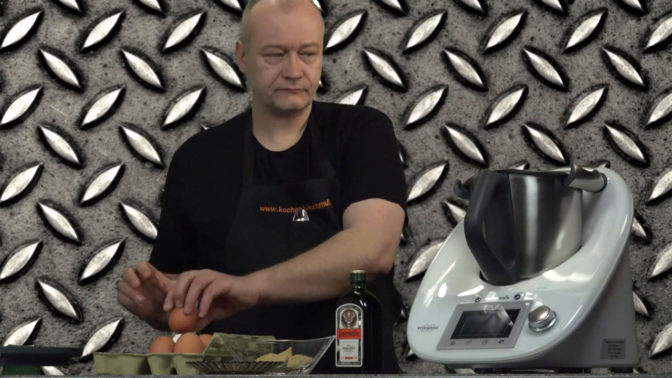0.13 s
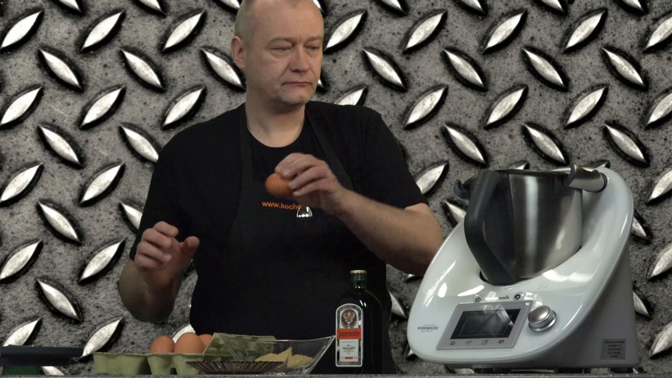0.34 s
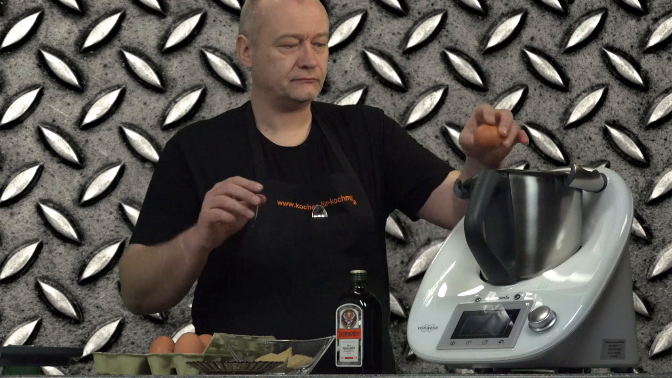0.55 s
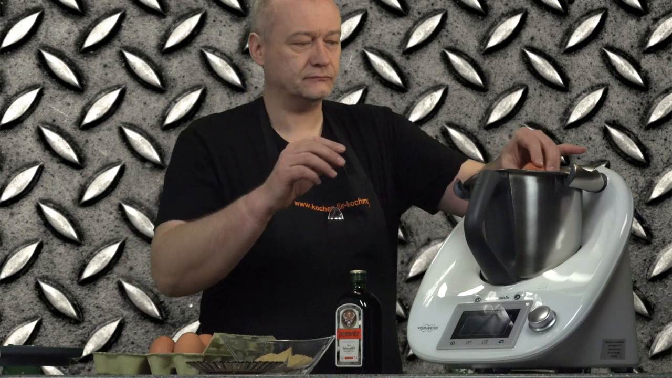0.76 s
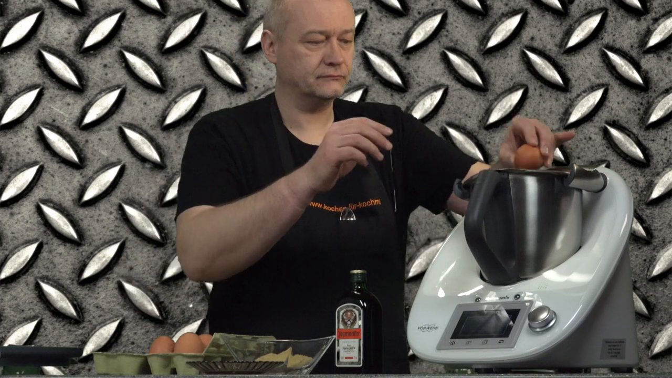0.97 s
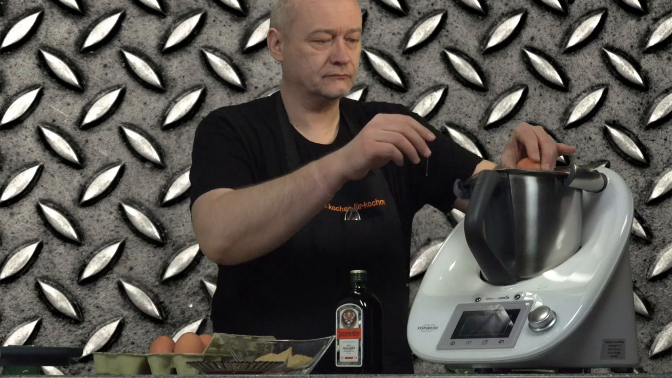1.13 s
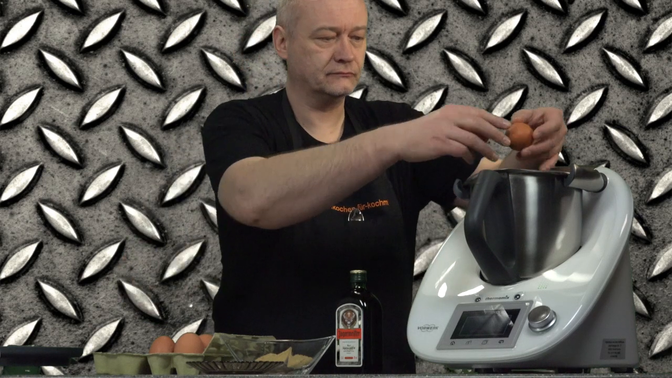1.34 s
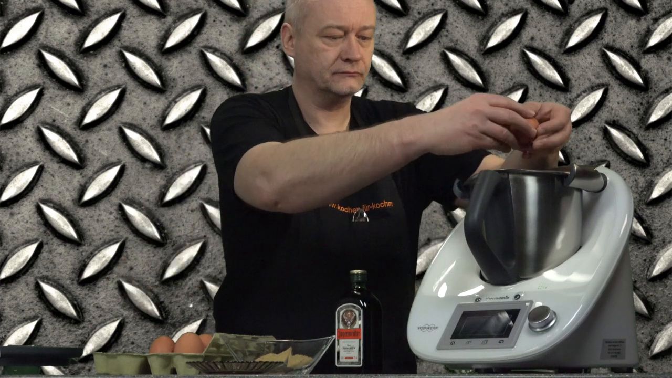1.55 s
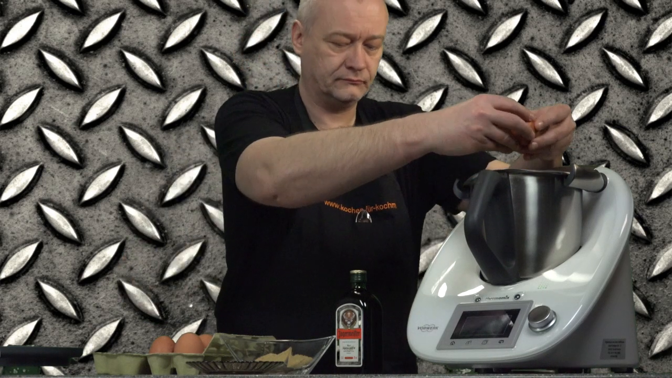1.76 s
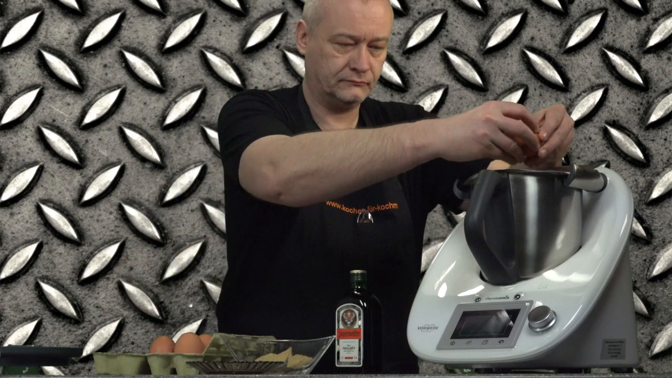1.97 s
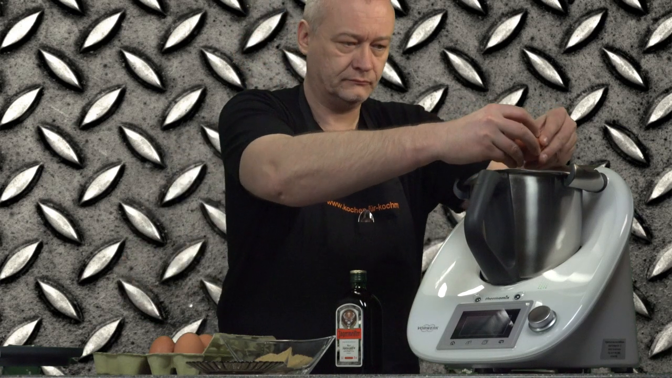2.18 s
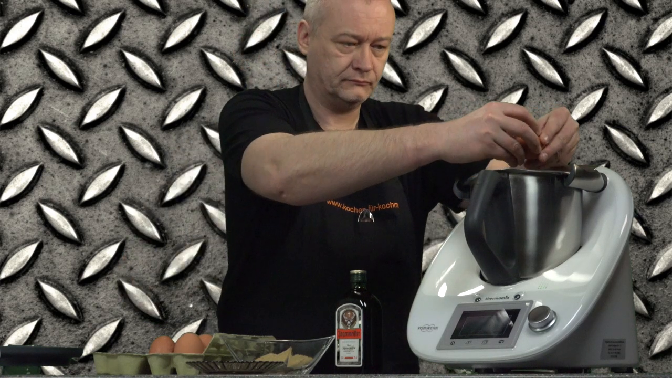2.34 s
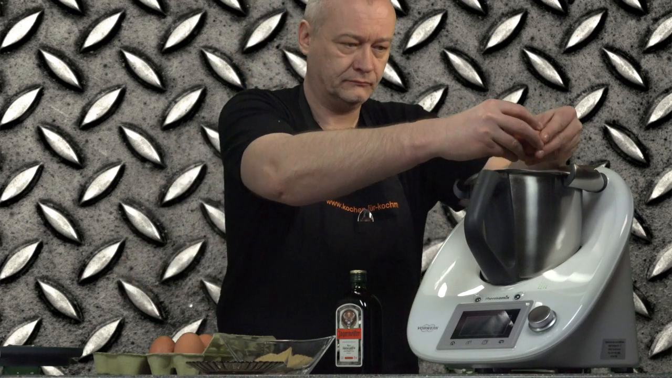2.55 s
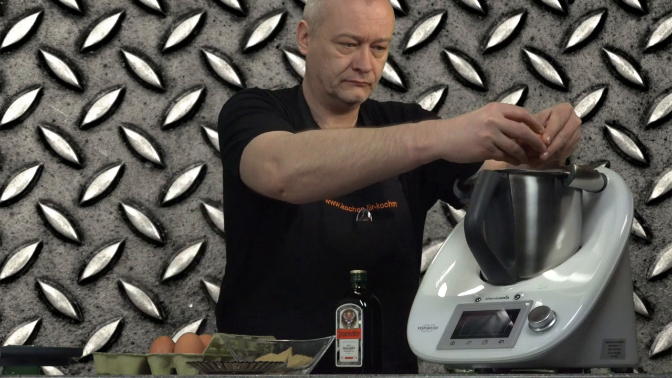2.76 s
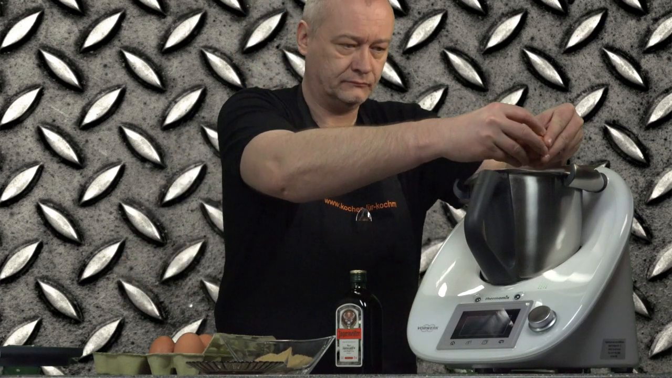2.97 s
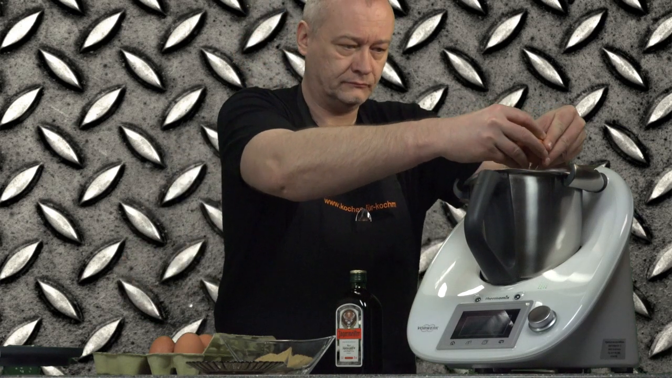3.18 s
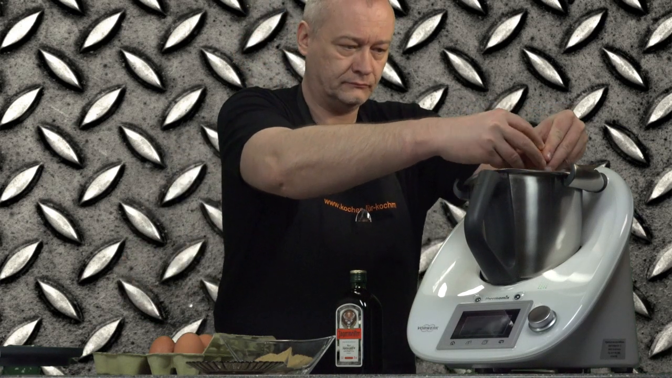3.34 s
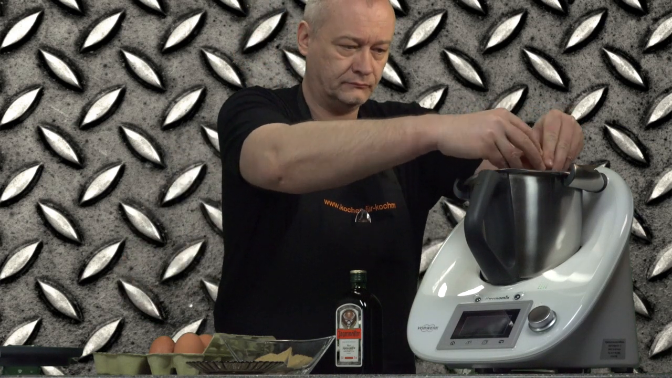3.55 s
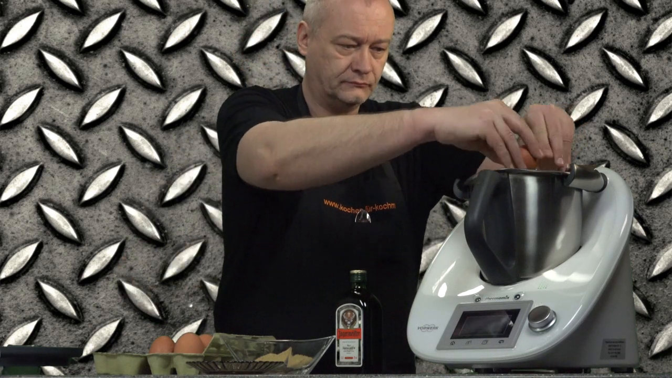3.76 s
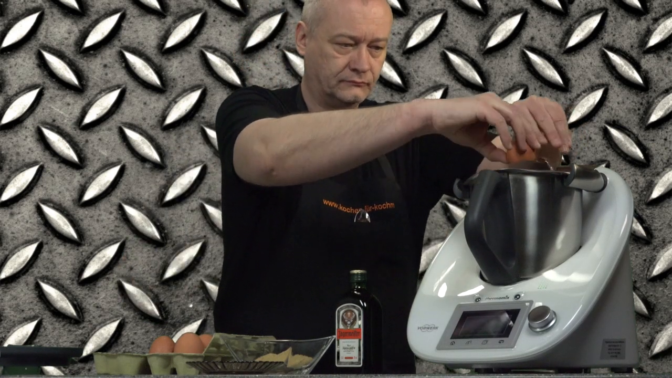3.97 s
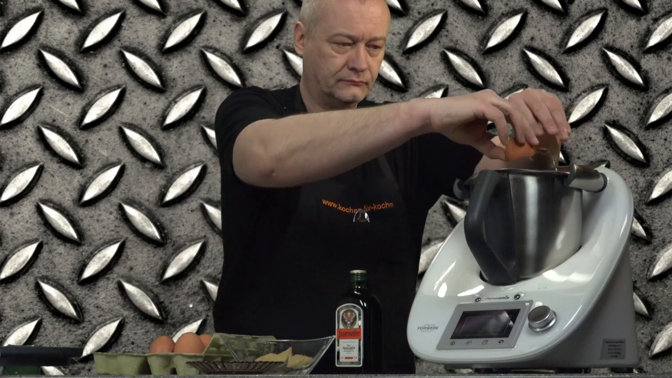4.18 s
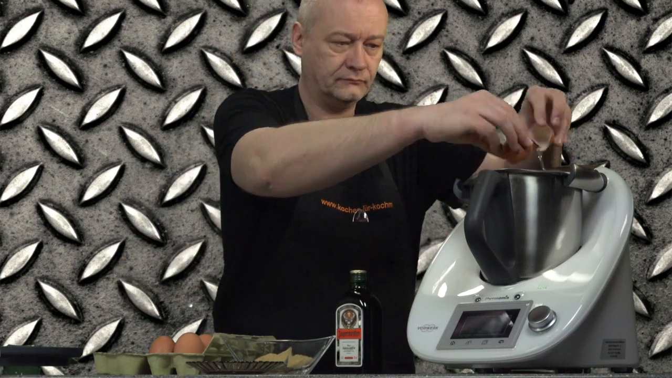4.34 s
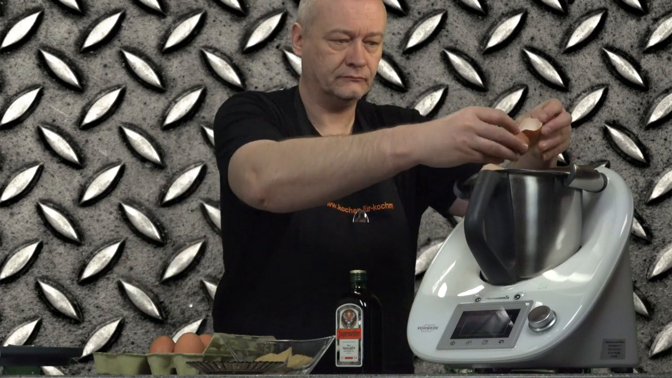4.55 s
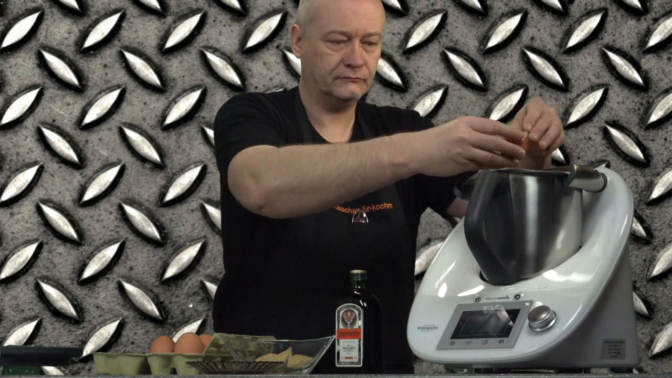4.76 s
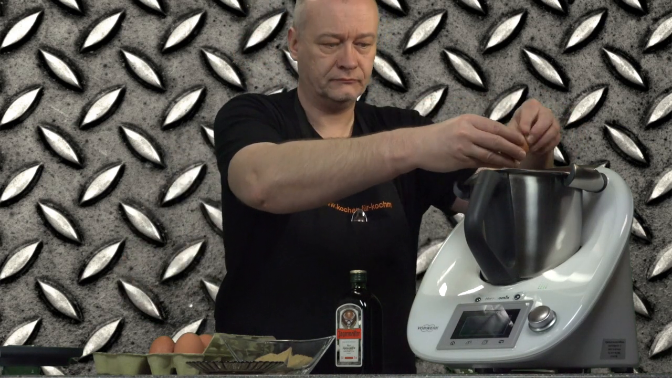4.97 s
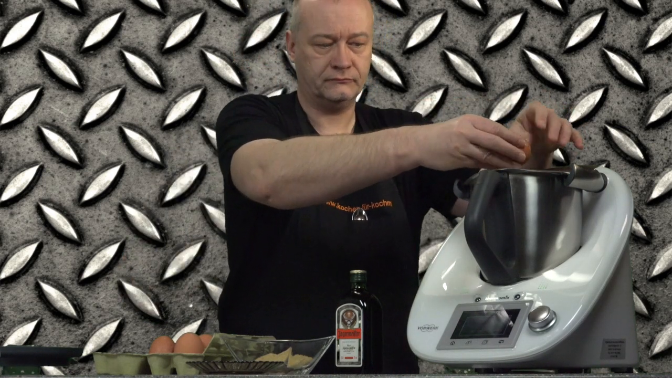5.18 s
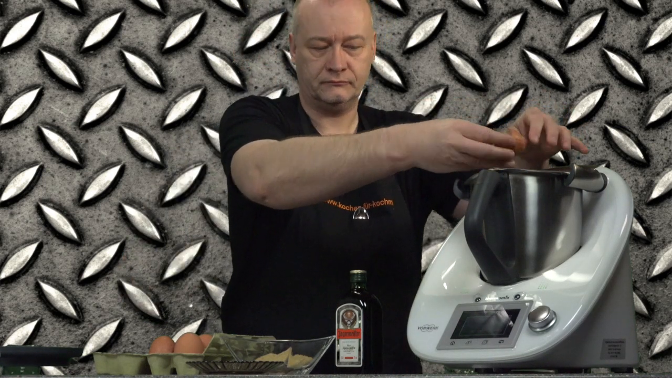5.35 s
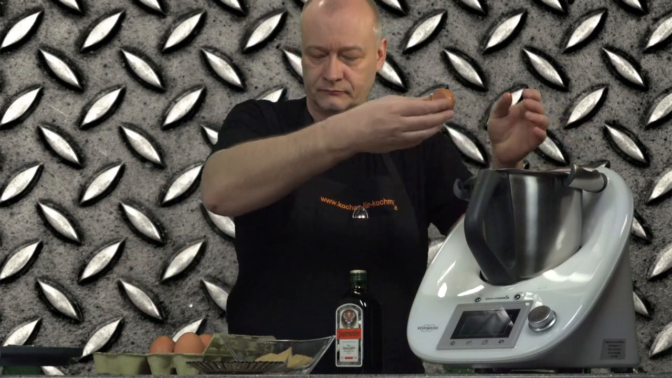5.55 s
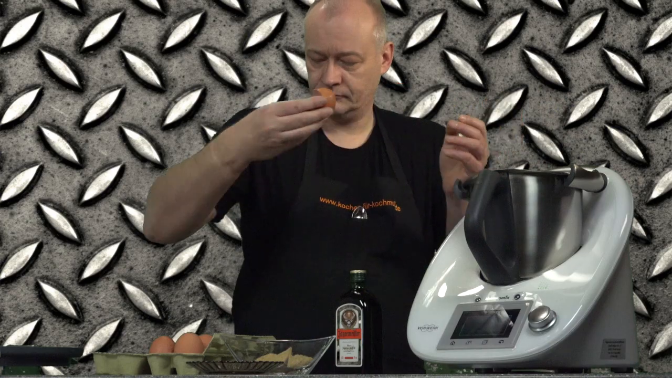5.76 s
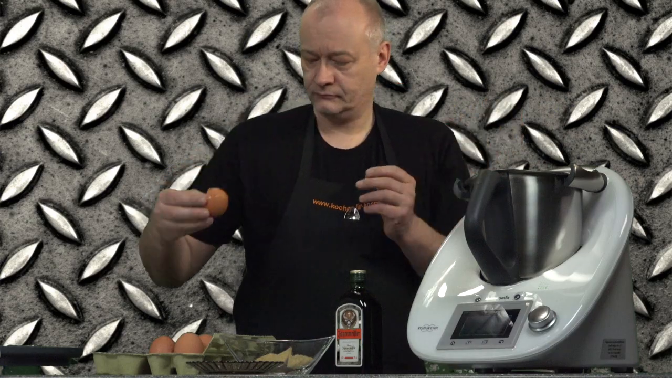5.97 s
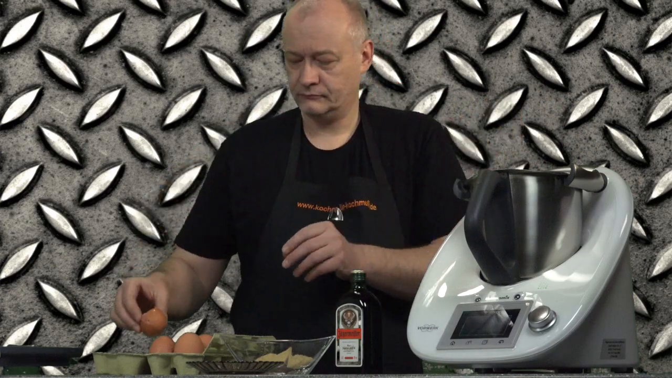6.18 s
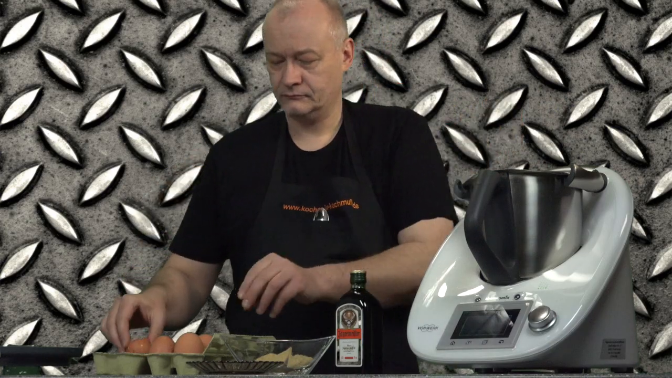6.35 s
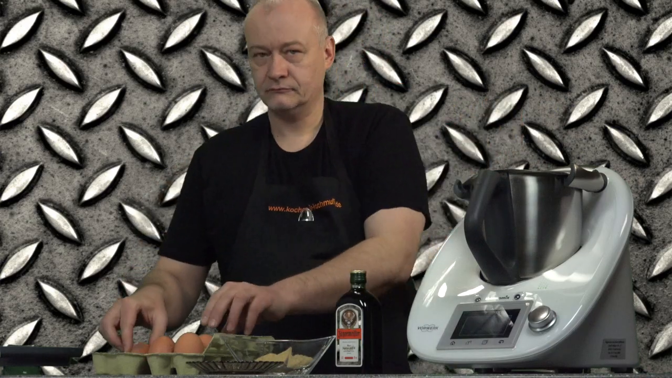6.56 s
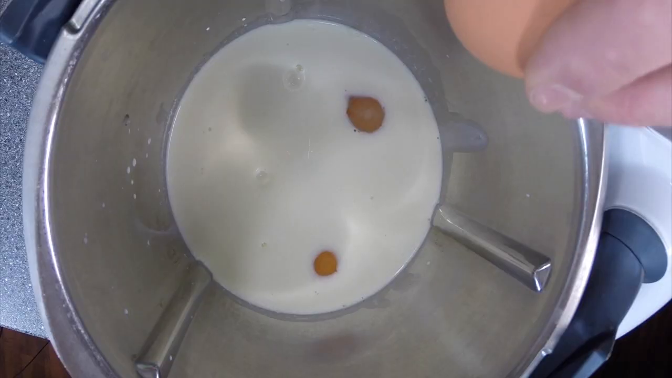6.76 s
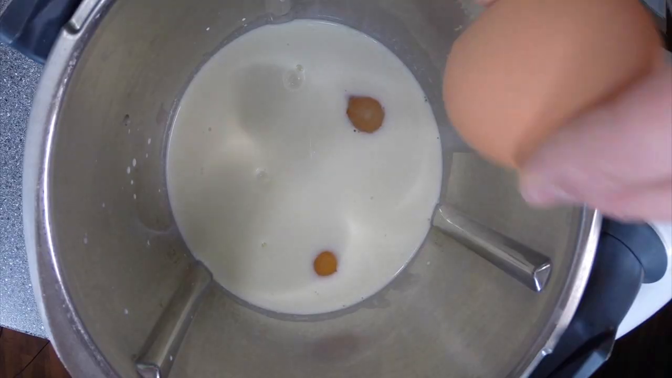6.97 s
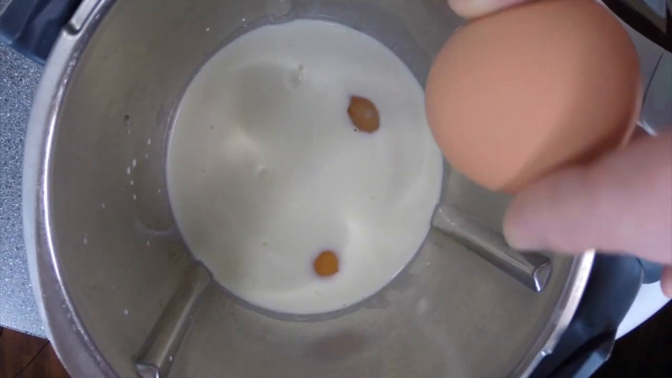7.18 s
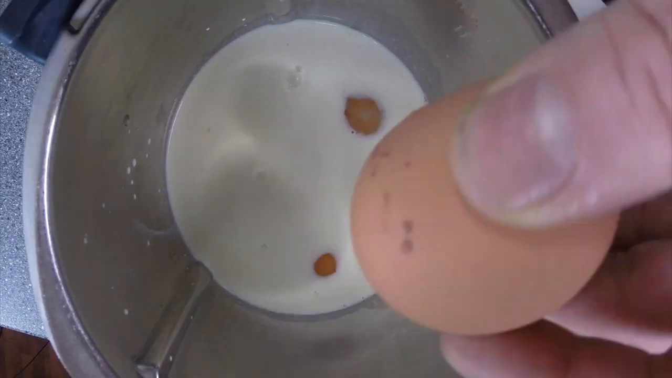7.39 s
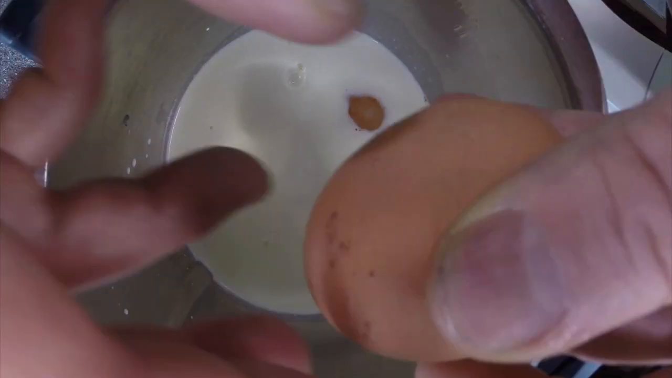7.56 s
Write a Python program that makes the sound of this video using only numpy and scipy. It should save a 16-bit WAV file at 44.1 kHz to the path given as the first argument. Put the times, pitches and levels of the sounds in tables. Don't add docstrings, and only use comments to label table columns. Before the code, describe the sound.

In a small hard-walled kitchen with low duct rumble, fridge chugging and faint hiss, a sleeve rustles, then an egg is struck twice on a steel bowl rim, the second blow loud and ringing. Crisp snaps, pops and crunches follow as the shell opens. After a quiet pause and a tiny dropout, a soft knock and a harsh, overloaded knock end it.

```python
import sys
import numpy as np
from scipy import signal
from scipy.fft import rfft, irfft
from scipy.io import wavfile

SR = 44100
rng = np.random.default_rng(int(sys.argv[2]) if len(sys.argv) > 2 else 0)


def undo_db(level):
    steps = np.asarray(level, float) / 20
    return 10 ** steps


def store_pcm(level_fs):
    pcm = np.round(np.clip(level_fs, -1, 1) * 32767).astype(np.int16)
    wavfile.write(sys.argv[1], SR, np.atleast_2d(pcm).T)


N = 336042


def rms_one(x):
    return x / np.sqrt(np.mean(x ** 2) + 1e-20)


def peak_one(x):
    return x / np.abs(x).max()


def in_time(rows):
    s, *columns = np.transpose(rows)
    return [np.interp(np.arange(N) / SR, s, c) for c in columns]


def at_hz(points, hz):
    hzs, *columns = np.transpose(points)
    return [np.interp(np.log(hz), np.log(hzs), c) for c in columns]


def bin_hz(size):
    return np.maximum(np.fft.rfftfreq(size, 1 / SR), 1)


def band(x, low_hz, high_hz):
    sos = signal.butter(2, [low_hz, high_hz], "band", fs=SR, output="sos")
    return signal.sosfilt(sos, x)


def resonate(x, hz, width_hz):
    r = np.exp(-np.pi * width_hz / SR)
    return signal.lfilter([1 - r, 0, r - 1], [1, -2 * r * np.cos(2 * np.pi * hz / SR), r * r], x)


def ring(hz, t60_s, t):
    return np.sin(2 * np.pi * hz * t) * undo_db(-60 * t / t60_s)


def swell(s, width_s):
    return np.exp(-.5 * ((np.arange(N) / SR - s) / width_s) ** 2)


def burst(decay_s, rise_s, size):
    t = np.arange(size) / SR
    spray = rng.standard_normal(size) * np.exp(-t / decay_s) * (1 - np.exp(-t / rise_s))
    spectrum = rfft(spray)
    return irfft(spectrum / np.abs(spectrum) ** .7, size) * np.exp(-t / (4 * decay_s))


def coloured(spectrum, channels, size=N):
    white = rfft(rng.standard_normal((channels, size)))
    return rms_one(irfft(white * undo_db(at_hz(spectrum, bin_hz(size))[0]), size))


def stereo(mid, side):
    return np.array([mid + side, mid - side])


def add(out, s, sound):
    i = round(s * SR)
    out[i:i + len(sound)] += sound[:N - i]


# time in seconds, level in dB.
AIRFLOW = [(0.0, -33), (0.25, -31), (0.8, -33), (0.88, -31), (4.02, -35), (4.04, -34), (4.14, -37),
           (4.31, -40.5), (4.39, -41), (4.48, -39), (6.12, -32), (6.88, -38.5), (7.02, -45.5), (7.23, -38),
           (7.42, -48.5), (7.55, -40)]


def airflow_swing_db():
    return in_time(AIRFLOW)[0] + 34.5


# frequency in Hz, width in Hz.
DUCTS = [(42, 10.3), (70, 19.4)]
# time in seconds, deep level in dB, upper level in dB.
GUSTS = [(.04, -45, -31), (.22, -42, -32), (1.33, -16, -31), (1.62, -43, -49), (1.91, -45, -17.5),
         (2.1, -63, -28), (2.29, -48, -36), (2.42, -21, -56), (3.01, -23, -24), (3.27, -27, -34),
         (3.45, -34, -41), (4.05, -24, -62), (4.39, -30, -66), (5.01, -30, -45), (5.41, -22, -48),
         (5.87, -28, -47), (6.09, -26, -50), (6.3, -19, -47), (6.41, -38, -50), (6.75, -32, -51)]
DEEP_DB, UPPER_DB, GUST_S = -37, -41, 0.018


def rumble():
    out, swing_db = 0, airflow_swing_db()
    steady = undo_db(DEEP_DB + swing_db), undo_db(UPPER_DB + 1.96 * swing_db)
    for k, (hz, width_hz) in enumerate(DUCTS):
        air = rng.standard_normal(N + SR)
        tone = resonate(resonate(air, hz, width_hz), hz, width_hz)
        tone = tone / np.abs(signal.hilbert(tone)) ** 0.3
        gusts = sum(undo_db(db[k] - 10) * swell(s, GUST_S) for s, *db in GUSTS)
        out = out + (steady[k] + gusts) * rms_one(band(tone, 15, 210)[SR:])
    return out


# time in seconds, chug level in dB.
COMPRESSOR = [(0, -61), (1.1, -40.5), (1.4, -46.5), (4.58, -45), (4.63, -95), (6.79, -68), (6.81, -46),
              (7.62, -45)]
STROKE_HZ, STROKE_START_S = 23.98, .031
DRONE_DB, MOTOR_DRONE_DB = -50, -16.5
FAN_HZ, FAN_DB = 1190, -54.5


def compressor():
    chug_db, = in_time(COMPRESSOR)
    stroke_s = STROKE_START_S + np.arange(N / SR * STROKE_HZ - 1) / STROKE_HZ
    at = (stroke_s * SR).astype(int)
    strokes = np.zeros(N)
    strokes[at] = undo_db(rng.normal(0, 2.5, len(at)))
    strokes += 1e-18
    housing = resonate(resonate(strokes, 641, 29.0), 774, 132)
    housing += undo_db(-15.5) * resonate(resonate(strokes, 1145, 165), 1150, 170)
    chug = undo_db(chug_db - 5.0) * rms_one(housing)

    drone_level = undo_db(DRONE_DB + 0.62 * airflow_swing_db()) + undo_db(chug_db + MOTOR_DRONE_DB)
    air = rng.standard_normal(N)
    drone = drone_level * rms_one(band(air, 71, 217) + undo_db(2) * resonate(air, 221.0, 13.8))

    whistle = resonate(resonate(rng.standard_normal(N), FAN_HZ, 130), FAN_HZ, 170)
    return chug + drone + undo_db(FAN_DB) * rms_one(whistle)


# frequency in Hz, density in dB per Hz.
HISS_COLOUR = [(180, -13.5), (300, -4), (321, -9), (469, -5), (535, -8), (581, -4), (939, -6.5),
               (1160, 0.5), (1330, -10), (2150, -10), (4750, -15.5), (12000, -18.5), (15600, -23)]
# frequency in Hz, left-right likeness from 0 to 1.
LIKENESS = [(300, 0.083), (700, 0.42), (1500, 0.46), (3000, 0.22), (7000, 0.65), (15000, 0.99)]
HISS_DB = -45.82


def hiss():
    alike = np.clip(at_hz(LIKENESS, bin_hz(N))[0], 0, 1)
    shares = np.sqrt([1 + alike, 1 - alike]) / np.sqrt(2)
    mid_side = irfft(rfft(coloured(HISS_COLOUR, channels=2)) * shares, N)
    return undo_db(HISS_DB) * stereo(*mid_side)


# time in seconds, level in dB, width in seconds.
RUSTLE = [(0.0, -46, 0.044), (0.152, -41, 0.028), (.4, -54.5, 0.28), (0.798, -53, 0.02),
          (6.46, -51.5, 0.02), (6.57, -48.5, 0.061), (6.71, -47, 0.031)]
# frequency in Hz, density in dB per Hz.
RUSTLE_COLOUR = [(240, -40), (400, -3.5), (593, -5), (817, 3.5), (1230, 3.5), (1930, -0.5), (5750, -4.5),
                 (13000, -30.5)]


def rustle():
    level = sum(undo_db(db + 5.0) * swell(s, width_s) for s, db, width_s in RUSTLE)
    return level * coloured(RUSTLE_COLOUR, channels=1)[0]


# time in seconds, blow in dB, crushing rise in seconds, crushing time in seconds,
# seconds until the hand stills the bowl.
KNOCKS = [
    (0.8252, -5.5, 0.0029, 0.0058, 0.11),
    (1.1231, 1.5, 0.00045, 0.024, 0.12),
    (7.382, -21, .004, 0.0054, .1),
    (7.5634, 4, 0.00034, 0.029, .14),
]
# frequency in Hz, density in dB per Hz.
BLOW_COLOURS = [
    [(100, -32), (170, 2.5), (267, -7), (322, -9.5), (936, 1), (1070, -17), (1240, -1), (2670, -25.5),
     (4520, -13.5), (6220, -23), (10700, -28), (15000, -42)],
    [(53, -43), (90, 0), (141, -43), (203, -14.5), (645, -19), (948, -10.5), (1150, -13), (1310, -8),
     (1580, -12.5), (3730, -26), (4520, -13), (15000, -30.5)],
    [(120, -43), (200, -2.5), (346, -4.5), (609, -14), (801, -8), (873, -20), (1210, -15), (1820, -22.5),
     (2280, -31.5), (12000, -34), (15600, -71), (22000, -120)],
    [(71, -52), (120, -20), (592, -22), (802, 3), (905, -15), (1300, 1), (1660, -5.5), (2430, -13.5),
     (3720, -26.5), (5800, -15), (15000, -25)],
]
# frequency in Hz, level in dB, t60 in seconds.
MODES_FIRST = [(199, -3.5, 0.21), (333, 5.5, 0.073), (555, 6, 0.064), (751, -3, 0.24), (950, -8, .07),
               (1190, 0, 0.11), (2490, -11.5, 0.15), (3290, -10, 0.09), (4200, -7, 0.06), (4580, 4, 0.06)]
MODES_HARD = [(111, -16, 0.12), (260, -29, 0.14), (616, -13, 0.19), (810, 0.5, 0.098), (1308, 8.5, 0.2),
              (1710, -11, 0.087), (1886, -2, 0.088), (2535, -17.5, 0.55), (4380, -16, 0.073),
              (4625, 4.5, 0.071), (5780, 6, 0.024)]
MODES_SOFT = [(322, 8.5, 0.082), (337, -9, 0.093), (497, 9.5, 0.053), (819, 8.5, 0.14), (944, -1, 0.16)]
MODES_LAST = [(810, 6, 0.18), (1303, -3, 0.26), (1493, -10, 0.3), (1800, -7, .1), (2170, 6, 0.081),
              (2365, -1, 0.2), (3400, -5, 0.12), (4690, -13, 0.073), (5780, -17, .1)]
RING_DB = -6.5


def bowl():
    blows, rings, t = np.zeros(N), np.zeros(N), np.arange(SR // 4) / SR
    bowl_modes = (MODES_FIRST, MODES_HARD, MODES_SOFT, MODES_LAST)
    for knock, colour, modes in zip(KNOCKS, BLOW_COLOURS, bowl_modes):
        s, blow_db, rise_s, crush_s, free_s = knock
        onset = 1 - np.exp(-t / rise_s)
        crush = coloured(colour, channels=1, size=len(t))[0] * np.exp(-t / crush_s) * onset
        add(blows, s, undo_db(blow_db) * peak_one(crush))
        stilled = undo_db(-900 * np.maximum(t - free_s, 0)) * onset
        for hz, level_db, t60_s in modes:
            add(rings, s, undo_db(blow_db + RING_DB + level_db) * ring(hz, t60_s, t) * stilled)
    return blows, rings


# time in seconds, snap in dB, snap frequency in Hz, thud in dB re snap.
CRACKS = [(1.2534, -30.5, 4530, 2), (1.3328, -46, 4570, 13), (1.5375, -24, 5340, -20),
          (1.7483, -35, 4990, -14), (2.011, -35, 6330, -18), (2.027, -23, 3890, -18),
          (2.0433, -11.5, 4300, -22.5), (2.1088, -7.5, 5000, -28.5), (2.2653, -20, 5200, -55),
          (2.6422, -27.5, 4600, -12), (2.6992, -15, 4970, -18.5), (2.981, -35, 5740, -17),
          (3.1226, -30.5, 5900, -10.5), (3.318, -31.5, 6170, -30), (3.6333, -25.5, 5100, -37),
          (3.702, -17, 4120, -36), (4.3881, -22.5, 6300, -34), (6.4392, -37.5, 3900, 6.5),
          (6.4657, -38, 3710, -22), (6.9985, -32, 4630, -13)]
# time in seconds, snap in dB, snap frequency in Hz,
# thud in dB re snap, tick in dB re snap.
SPLINTERS = [(1.5003, -41.5, 4870, 11, 0), (2.4742, -14, 4560, -20.5, 5), (2.5327, -11.5, 4830, -15, 8),
             (3.21, -29.5, 5500, -9, 8), (3.3773, -30, 3900, -13, 2), (3.7338, -15, 3900, -25, 1),
             (4.883, -27.5, 4960, -17, 11.5), (4.9447, -22, 4800, -35, 16), (5.348, -26, 3770, -21, -2)]
CRACK_TICK_DB = -1.5
HOLLOW_DB, HOLLOW_PER_THUD, HOLLOW_PER_TICK = -7.2, 0.067, 0.34


def fractures():
    out, click = np.zeros(N), np.eye(1, 1024)[0]
    thud = peak_one(band(click, 310, 780))
    hollow = peak_one(resonate(click, 1680, 730))
    snap_click = band(click, 3940, 19845)
    breaks = [(*row, CRACK_TICK_DB) for row in CRACKS] + list(SPLINTERS)
    for s, snap_db, snap_hz, thud_db, tick_db in breaks:
        hollow_db = HOLLOW_DB + HOLLOW_PER_THUD * thud_db + HOLLOW_PER_TICK * tick_db
        spray = burst(0.0011, .00005, size=len(click))
        tick = 0.618 * peak_one(band(band(spray, 6600, 12500), 2900, 12800))
        sound = peak_one(resonate(snap_click, snap_hz, 1800))
        sound += undo_db(tick_db) * tick + undo_db(thud_db) * thud + undo_db(hollow_db) * hollow
        add(out, s, undo_db(snap_db) * sound)
    return out


# time in seconds, hollow note in dB, hollow note in Hz,
# overtone in dB re hollow, grit in dB re hollow.
CRUNCHES = [(3.3589, -13, 1660, -44, -9.5), (3.3769, -8.5, 1610, -42, -13), (3.3838, -14, 1550, -3, -42),
            (3.4106, -30, 1570, -24, 0), (3.423, -31, 1590, -24, -9), (3.5288, -28, 1230, -0.5, -14),
            (3.7327, -6.5, 1564, -7, -11), (4.6797, -27, 1800, 2, -3), (4.6971, -20, 1800, 2, -28),
            (4.7218, -18, 1820, -6, -11), (4.8267, -23.5, 1730, -1.5, -12),
            (4.8433, -23.5, 1710, -23, -4.5), (4.867, -36, 1720, -11, -6), (5.164, -35, 1720, -3, -5.5)]
# time in seconds, level in dB, frequency in Hz.
POPS = [(3.252, -36.5, 1840), (3.251, -40, 3600), (3.374, -21.5, 890), (3.529, -25, 2100),
        (3.70, -19, 4370), (5.348, -40, 2800), (4.86, -31, 5000), (4.91, -33, 4500), (4.388, -43, 2400),
        (5.165, -43, 3200), (3.741, -19, 2880), (4.1006, -41, 1780), (4.699, -28.5, 1010)]
POP_OVER_DB, POP_GRIT_DB = -15, -12
OVERTONE_RATIO = 1.327


def crunches():
    out = np.zeros(N)
    grindings = list(CRUNCHES) + [(*row, POP_OVER_DB, POP_GRIT_DB) for row in POPS]
    for s, hollow_db, hollow_hz, over_db, grit_db in grindings:
        grind = burst(0.002, 0.00034, size=2048)
        sound = peak_one(resonate(resonate(grind, hollow_hz, 174), hollow_hz, 690))
        sound += undo_db(over_db + 0.1) * peak_one(resonate(grind, OVERTONE_RATIO * hollow_hz, 220))
        grit = resonate(grind, 5000, 400) + undo_db(-11) * band(band(grind, 2500, 8000), 1500, 14000)
        sound += undo_db(grit_db + 8.0) * peak_one(grit)
        add(out, s, undo_db(hollow_db - 4.5) * sound)
    return out


# delay in seconds, level in dB.
ECHOES = [(.0013, -1), (.0028, -5), (.0047, -7), (.0071, -9)]
SHADOW_HZ = 7000


def nearby(x):
    x = signal.lfilter(*signal.butter(1, SHADOW_HZ, fs=SR), x)
    out = x.copy()
    for delay_s, echo_db in ECHOES:
        add(out, delay_s, undo_db(echo_db) * x)
    return out


# frequency in Hz, t60 in seconds, build-up in seconds, level in dB, side in dB re mid.
ROOM = [(198, 0.38, 0.018, -19.5, -48), (674, 0.22, 0.0025, -22.5, -21), (1610, 0.28, 0.00067, -19, -12),
        (3970, 0.28, 0.00056, -16.5, -30), (8460, 0.27, 0.002, -27.5, -4),
        (15600, 0.14, 0.0086, -30.5, -16)]


def kitchen(x):
    t, tail = np.arange(SR // 2) / SR, 0
    edges_hz = 100 * 2 ** np.arange(0, 8, .5)
    white = rng.standard_normal((2, 2, len(t)))
    for k, (low, high) in enumerate(zip(edges_hz, edges_hz[1:])):
        t60_s, rise_s, level_db, side_db = at_hz(ROOM, np.sqrt(low * high))
        shape = undo_db(level_db - 60 * t / t60_s) * (1 - np.exp(-t / rise_s))
        tail = tail + shape * band(white[k % 2], low, high) * undo_db([[0], [side_db]])
    return stereo(*signal.fftconvolve(x[None], tail, axes=1)[:, :N])


DIRECT_DB = -1.5
SNAP_DIRECT_DB, GRIND_DIRECT_DB = 0.5, 3
RING_ROOM_DB = -11.5


def scene():
    background = rumble() + compressor() + hiss() + rustle()
    blows, rings = bowl()
    snaps, grinds = fractures(), crunches()
    shell = nearby(undo_db(SNAP_DIRECT_DB) * snaps + undo_db(GRIND_DIRECT_DB) * grinds)
    room = kitchen(blows + undo_db(RING_ROOM_DB) * rings + snaps + grinds)
    return undo_db(DIRECT_DB) * (blows + rings + shell) + room + background


def low_pass(x):
    return signal.sosfilt(signal.butter(12, 15780, fs=SR, output="sos"), x)


GAP_START_S, GAP_END_S, GAP_DB = 6.7918, 6.8092, -34


def record(dry):
    x = np.clip(dry, -.99, .99)
    x[:, round(GAP_START_S * SR):round(GAP_END_S * SR)] *= undo_db(GAP_DB)
    return low_pass(x)


dry = scene()
out = record(dry)
store_pcm(out)
```